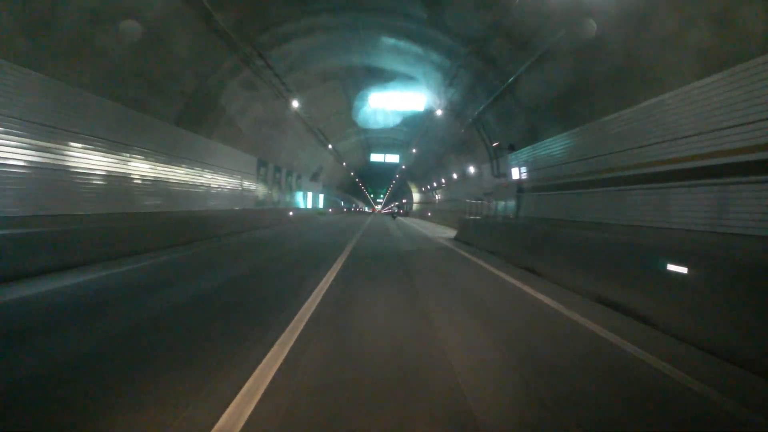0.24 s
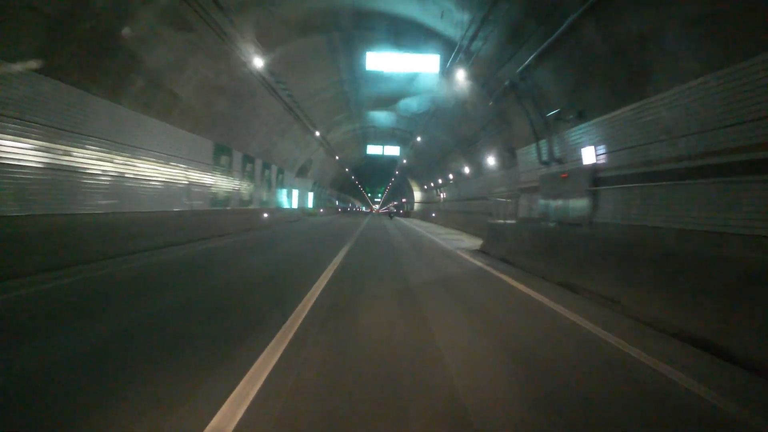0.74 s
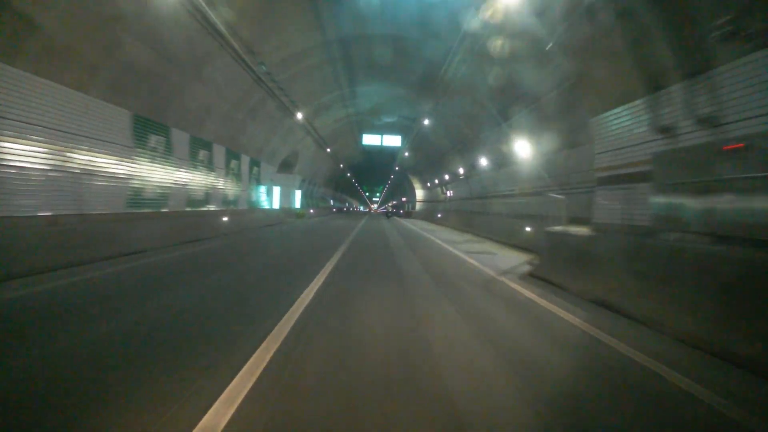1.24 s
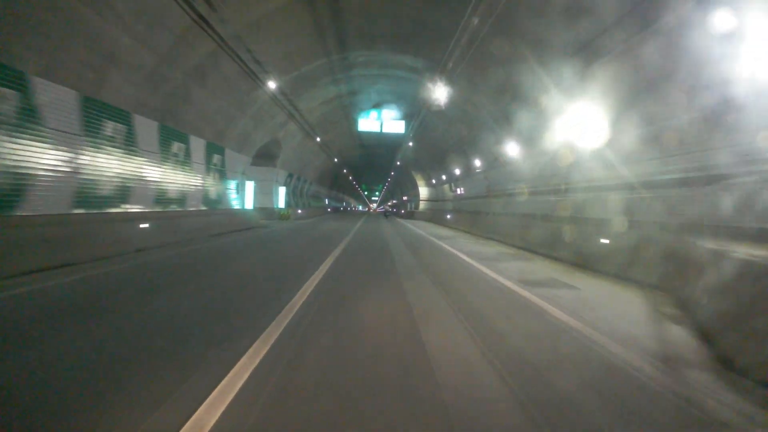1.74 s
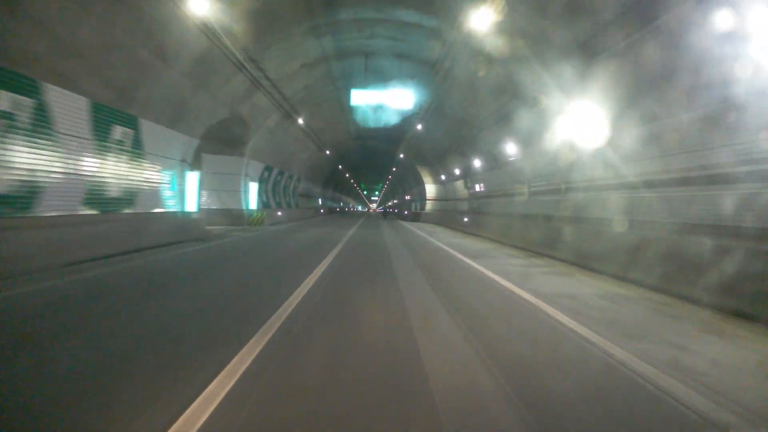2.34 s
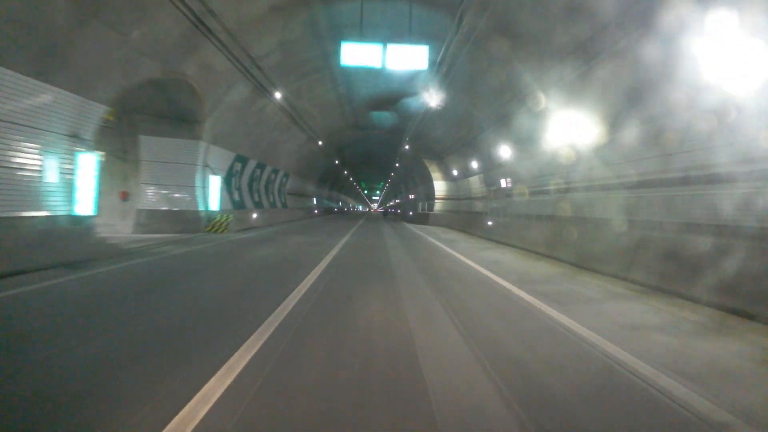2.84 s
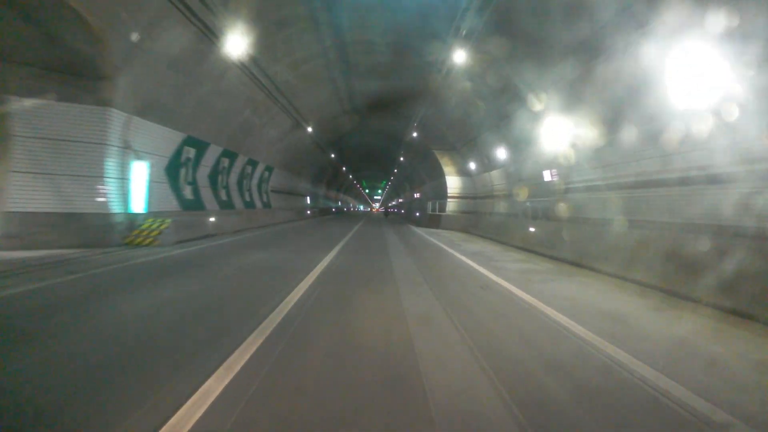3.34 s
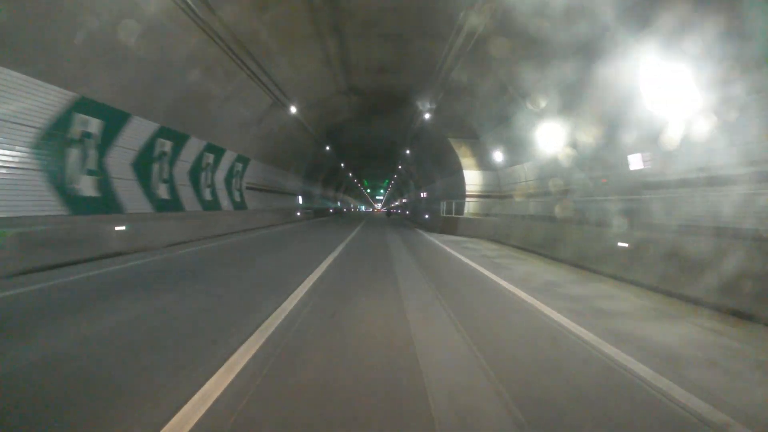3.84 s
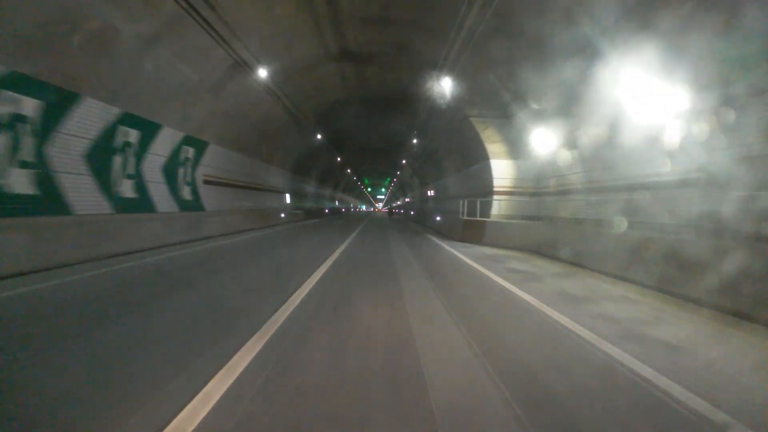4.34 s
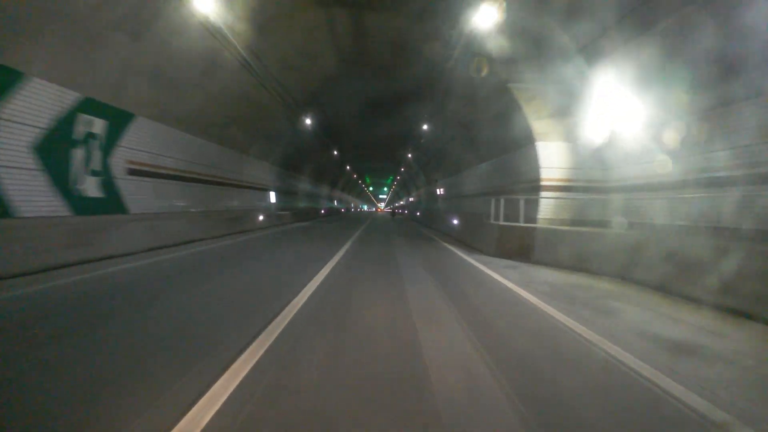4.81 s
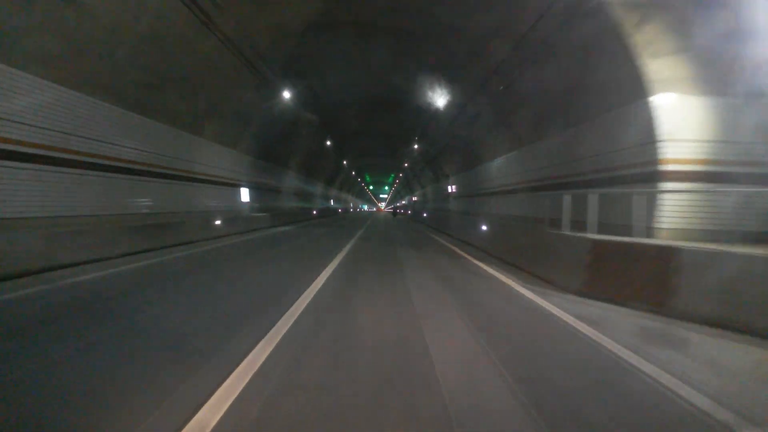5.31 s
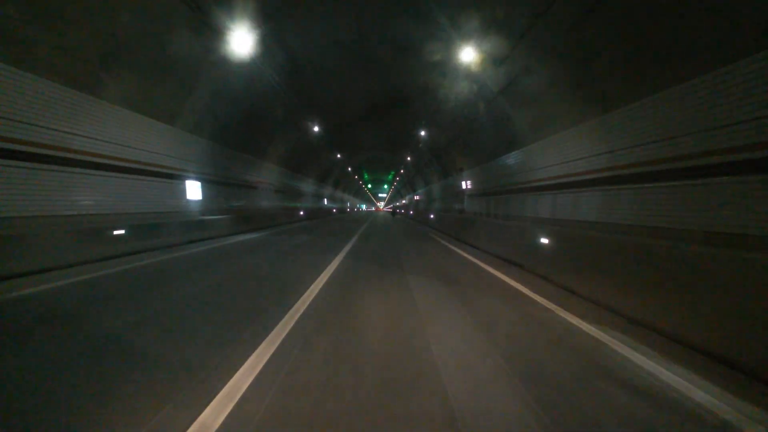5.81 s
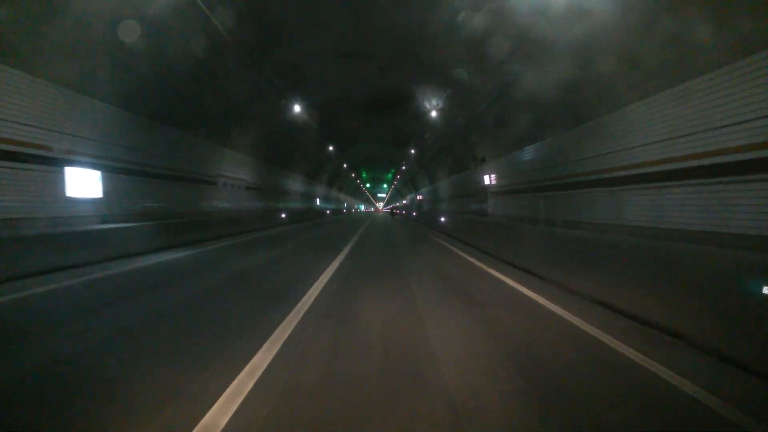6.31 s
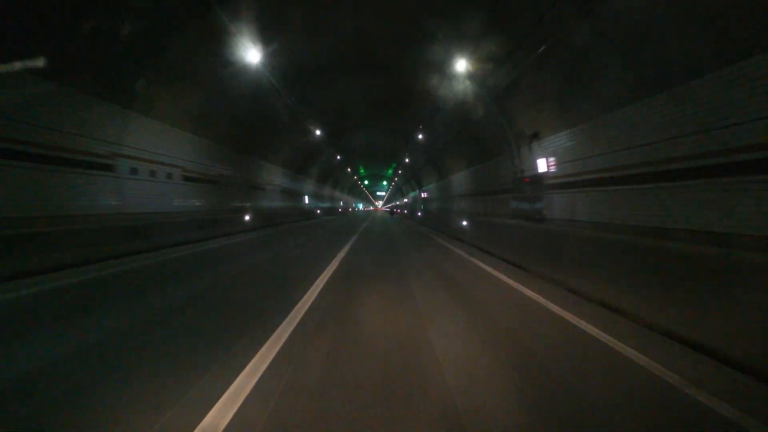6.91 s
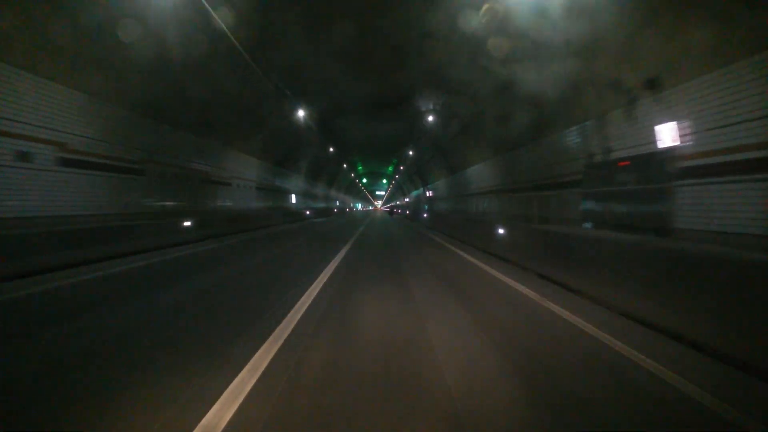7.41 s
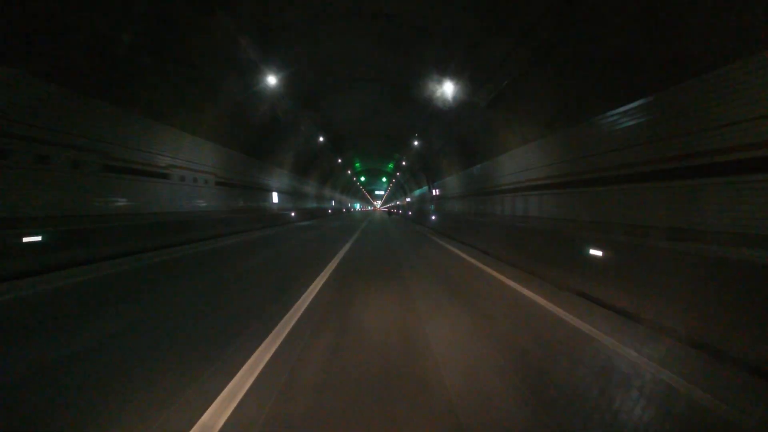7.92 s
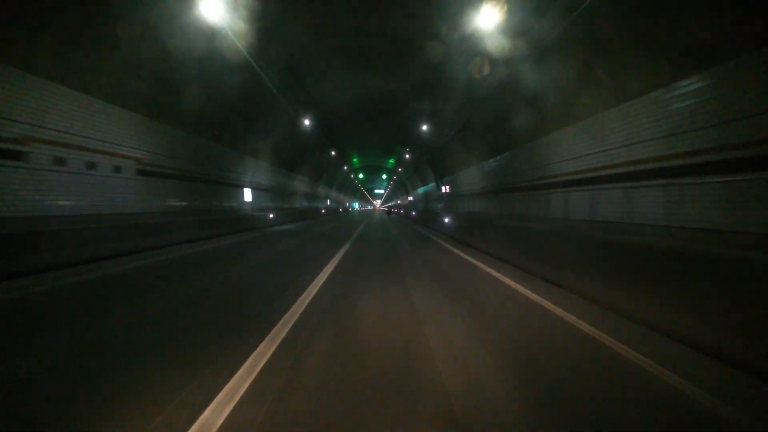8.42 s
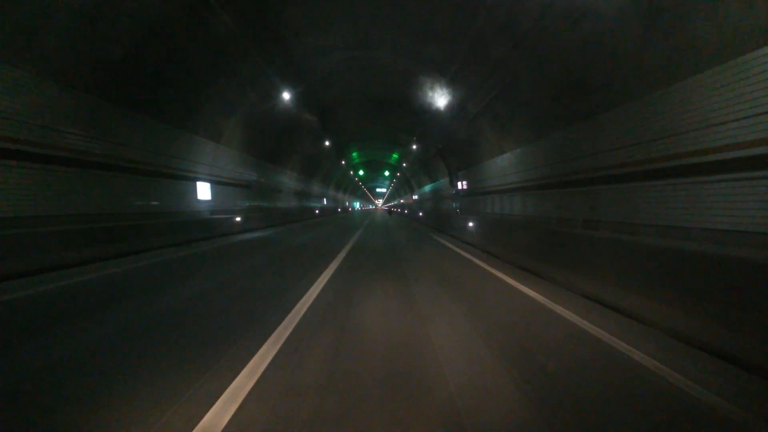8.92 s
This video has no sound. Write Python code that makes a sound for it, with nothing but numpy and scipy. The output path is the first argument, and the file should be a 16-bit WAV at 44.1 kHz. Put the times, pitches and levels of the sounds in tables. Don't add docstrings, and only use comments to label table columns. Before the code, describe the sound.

Inside a car cruising through a road tunnel, deep tyre rumble and engine hum run steadily under faint air hiss, with wall roar swelling twice.

```python
import sys
import numpy as np
from scipy import signal
from scipy.fft import rfft, irfft, next_fast_len
from scipy.io import wavfile

SR = 44100
rng = np.random.default_rng(int(sys.argv[2]) if len(sys.argv) > 2 else 0)


def undo_db(level):
    steps = np.asarray(level, float) / 20
    return 10 ** steps


def pcm_store(signal):
    levels = np.round(np.clip(np.atleast_2d(signal), -1, 1) * 32767)
    wavfile.write(sys.argv[1], SR, levels.astype(np.int16).T)


N = 403515


def read(points, hz):
    f, value = np.transpose(points)
    return np.interp(np.log(hz + 1), np.log(f + 1), value)


def wander(top_hz, count):
    knots = rng.standard_normal((count, 1024))
    spectrum = rfft(knots) / (1 + (np.arange(513) * SR / N / top_hz) ** 4)
    slow = irfft(spectrum)
    slow = slow / slow.std(axis=1, keepdims=True)
    places = np.linspace(0, 1023, N)
    return np.array([np.interp(places, np.arange(1024), row) for row in slow])


def bump(t, s, rise, fall):
    return np.exp(-.5 * ((t - s) / np.where(t < s, rise, fall)) ** 2)


def lift_at(modes, hz):
    return sum(db / (1 + ((hz - centre_hz) / width_hz) ** 2) for centre_hz, width_hz, db in modes)


LAG_S = 0.000492
# pitch_hz, share_of_lag (0-1)
LAG_TAKEN = [(300, 0.05), (450, 0.22), (520, 0.5), (620, 0.1), (720, 0.5), (850, 1.05), (20000, 1)]
# pitch_hz, likeness (0-1)
LIKENESS = [(30, 0.88), (70, 0.91), (125, 0.76), (175, 0.91), (250, 0.84), (310, 0.58), (400, 0.57),
            (470, .72), (620, 0), (680, 0.72), (780, 0.54), (1080, 0.7), (1200, 0.27), (8000, 0.07)]
# pitch_hz, left_over_right_db
LEFT_LEAN = [(20, 3), (100, 1.5), (200, 0.5), (400, -0.5), (520, 1.5), (800, 3), (1300, -1), (2200, 0),
             (2500, 0), (4500, 2), (5500, 1), (7000, -6), (8500, -2), (11000, 9)]
# pitch_hz, width_hz, lift_db
CABIN_MODES = [(34, 3.8, 4.5), (100, 5, 2), (169, 3.6, 1.5), (665, 14, 1.5), (697, 6.4, 1), (782, 11, 2.5),
               (934, 13, 1.5), (975, 15, 2.5), (1170, 16, 0), (1560, 28, 2.5), (1612, 20, 3), (1785, 18, 3),
               (2024, 40, 4.5), (2400, 40, 3), (2764, 21, 4), (3160, 30, -0.5), (5630, 91, 0)]


def noise(spectrum):
    size = next_fast_len(N)
    hz = np.fft.rfftfreq(size, 1 / SR)
    one, other = rfft(rng.standard_normal((2, size)))
    same = np.clip(read(LIKENESS, hz), 0, 1)
    lag = np.exp(-2j * np.pi * hz * LAG_S * read(LAG_TAKEN, hz))
    right = lag * same * one + np.sqrt(1 - same ** 2) * other
    inside = (hz > spectrum[0][0] / 2) & (hz < spectrum[-1][0])
    shape = undo_db(read(spectrum, hz) + lift_at(CABIN_MODES, hz)) * inside * np.sqrt(SR / 2)
    lean = undo_db(read(LEFT_LEAN, hz) / 2)
    return irfft(np.array([one * lean, right / lean]) * shape, size)[:, :N]


# start_s, load (-1 light to 1 heavy)
ENGINE_LOAD = [(0, -1.1), (1.4, -1.14), (2.3, -.3), (4.1, 0.21), (4.7, 0.58), (5.7, 0.89), (6.5, 0.16),
               (7.5, .6), (8.5, 0.33), (9.15, 0.25)]
# cycle_multiple, change_db (per unit of load)
LOAD_ANSWER = [(4, 6.5), (12, 2.5), (14, -3), (24.34, 3.5)]
# peak_s, length_s, cycle_multiple, change_db
SLACK_SURGES = [(2.5, 0.41, 12, -5), (3.13, 0.21, 24.34, 6.5), (2.45, .25, 24.34, -3.5),
                (4.2, 0.21, 24.34, -8.5), (4.1, 0.34, 12, -3), (2.88, 0.29, 14, -4), (4.84, 0.88, 14, 4),
                (5.88, 0.45, 24.34, -5.5), (8, 0.28, 24.34, 6), (7.67, .25, 12, 3), (8.4, 0.18, 12, 4),
                (8.85, 0.11, 12, 2.5)]


def line_change(order, t):
    load = np.interp(t, *np.transpose(ENGINE_LOAD))
    change_db = sum(db * load for k, db in LOAD_ANSWER if abs(k - order) < 2 / 3)
    for s, length, k, db in SLACK_SURGES:
        if abs(k - order) < 2 / 3:
            change_db = change_db + db * bump(t, s, length, length)
    return change_db


# start_s, cycle_hz
ENGINE_SPEED = [(0, 16.48), (3.65, 16.762), (6.4, 16.944), (8.2, 17.028), (9.15, 17.04)]
# cycle_multiple, level_db
ENGINE_TONES = [(2, -44), (4, -33), (6, -48), (8, -26), (9, -36.5), (10, -39), (12, -27), (13, -30),
                (13.34, -37.5), (14, -27), (15, -33), (17, -41.5), (20, -39), (23.77, -44), (24.34, -32.5),
                (24.91, -40), (28, -37.5), (32, -44), (34.44, -45), (36, -43.5), (39, -50), (68, -65.5),
                (69, -74), (70, -68.5), (71, -70.5), (72, -63.5)]
# cycle_multiple, left_over_right_db, left_lead_rad
TONE_PLACE = [(2, 1.7, -.1), (4, 1.8, .1), (8, -.5, 0), (9, 1.5, -.1), (10, -.8, -.2), (13, -.2, .1),
              (13.34, -3, .9), (14, -1.5, 0), (15, 1.4, .15), (20, 1.4, 0), (23.7, -3.8, -1.4),
              (25, -3.8, -1.4), (28, 2.9, -.15), (32, 6, .9), (34.44, 4.6, -1.6), (36, 1.2, -.7),
              (39, 3, 1.2), (68, 4.7, -.8), (72, 2, .6)]
# pitch_hz, width_hz, lift_db
DASH_PANELS = [
    (1146, 12, 10),
    (1193, 9, 11),
]


def engine(t):
    cycle_hz = np.interp(t, *np.transpose(ENGINE_SPEED))
    turns = np.cumsum(cycle_hz) / SR
    place, leans_db, leads = np.transpose(TONE_PLACE)
    drift = wander(3.6, count=8)
    out = np.zeros((2, N))
    sparse = slice(None, None, 256)
    for k, (order, db) in enumerate(ENGINE_TONES):
        is_gear = abs(order - round(order)) > 1 / 8
        loose = .5 if is_gear else .12
        angle = 2 * np.pi * (order * turns + rng.random()) + loose * drift[k % 4]
        level_db = db + line_change(order, t[sparse])
        level_db = level_db + lift_at(DASH_PANELS, order * cycle_hz[sparse])
        level_db = level_db + 5.1 * loose * drift[4 + k % 4, sparse]
        size = np.interp(t, t[sparse], undo_db(level_db))
        lean = undo_db(np.interp(order, place, leans_db) / 2)
        out[0] += size * lean * np.cos(angle + np.interp(order, place, leads))
        out[1] += size / lean * np.cos(angle)
    return np.sqrt(2) * out


# start_s, coarseness_db
ROAD_COARSENESS = [(0, -1.6), (3.8, -.5), (5.1, -1), (6, 0), (6.7, -1.5), (8.8, 1.5), (9.15, 1)]
# pitch_hz, density_db (per Hz)
TYRE_RUMBLE = [(12, -56), (30, -53.5), (65, -49), (95, -46.5), (135, -48.5), (170, -44.5), (205, -46),
               (225, -46.5), (300, -49.5), (400, -49), (450, -51.5), (520, -57), (620, -57), (900, -71.5)]
# pitch_hz, density_db (per Hz)
TREAD_ROAR = [(450, -69.5), (620, -65.5), (680, -53), (740, -56), (800, -57), (900, -63), (1050, -64.5),
              (1300, -70), (1650, -72.5), (1850, -76), (2300, -76.5), (2450, -73.5), (3000, -78.5),
              (4500, -88)]


def tyres(t):
    coarse_db = np.interp(t, *np.transpose(ROAD_COARSENESS))
    flutter_db = 0.63 * wander(4.5, count=1)
    rumble = noise(TYRE_RUMBLE) * undo_db(coarse_db)
    roar = noise(TREAD_ROAR) * undo_db(0.36 * coarse_db + flutter_db)
    return rumble + roar


# pitch_hz, density_db (per Hz)
SEAL_HISS = [(2000, -89.5), (3300, -86), (4500, -83), (5400, -79), (6000, -81.5), (7200, -82.5),
             (8000, -88), (9000, -89.5), (9800, -96.5), (10500, -100.5), (11300, -100), (12300, -102),
             (14600, -104)]
# peak_s, lift_db
SEAL_GUSTS = [(.92, 1.5), (2.35, 1.5), (2.95, 1), (3.42, 1.8), (3.997, 2.1), (5.02, 1.1), (7.05, 1.5),
              (7.25, 0.8), (7.762, 1.4), (8.75, .6)]


def air(t):
    gust_s = 0.041
    lift_db = sum(db * bump(t, s, gust_s, gust_s) for s, db in SEAL_GUSTS)
    return noise(SEAL_HISS) * undo_db(lift_db + 0.44 * wander(20.0, count=1))


# peak_s, rise_s, fall_s, boom_db, bright_db
WALL_SWELLS = [
    (4.85, 0.12, 0.18, -12, -2.5),
    (5.32, 0.26, 0.28, -6, -7),
    (7.73, 0.2, 0.34, -2, 2),
    (0.91, .04, 0.044, -12, 0),
]
# pitch_hz, density_db (per Hz)
WALL_BOOM = [(60, -58), (100, -55), (175, -42), (260, -49.5), (420, -54.5), (800, -58.5), (1000, -79)]
# pitch_hz, density_db (per Hz)
WALL_BRIGHT = [(500, -68.5), (800, -59.5), (1000, -64.5), (1250, -64.5), (1600, -77), (2000, -82),
               (3000, -95)]


def wall(t):
    boom, bright = 0, 0
    for s, rise, fall, boom_db, bright_db in WALL_SWELLS:
        swell = bump(t, s, rise, fall)
        boom = boom + undo_db(boom_db) * swell
        bright = bright + undo_db(bright_db) * swell
    return noise(WALL_BOOM) * boom + noise(WALL_BRIGHT) * bright


# peak_s, pitch_hz, level_db
SEAM_HUMS = [(3.45, 99.9, -28), (3.954, 665, -35), (5.054, 166.4, -22), (5.3, 166, -27), (5.25, 584, -34),
             (6.282, 198.3, -21), (6.646, 200.6, -21), (8.1, 173.3, -24), (7.753, 98, -28),
             (7.847, 789, -36), (7.905, 695, -32.5), (6.55, 665, -37), (4.952, 666, -36)]


def seams(t):
    hum_s = 0.081
    out = np.zeros((2, N))
    for s, hz, db in SEAM_HUMS:
        near = np.abs(t - s) < 4 * hum_s
        lag = 2 * np.pi * hz * LAG_S * read(LAG_TAKEN, hz)
        angle = 2 * np.pi * (hz * t[near] + rng.random()) - np.array([[0], [lag]])
        out[:, near] += np.sqrt(2) * undo_db(db) * bump(t[near], s, hum_s, hum_s) * np.cos(angle)
    return out


def scene():
    t = np.arange(N) / SR
    return engine(t) + tyres(t) + air(t) + wall(t) + seams(t)


def top_cut(x):
    return signal.sosfilt(signal.butter(12, 14500, fs=SR, output="sos"), x)


def record(dry):
    return top_cut(dry)


dry = scene()
out = record(dry)
pcm_store(out)
```